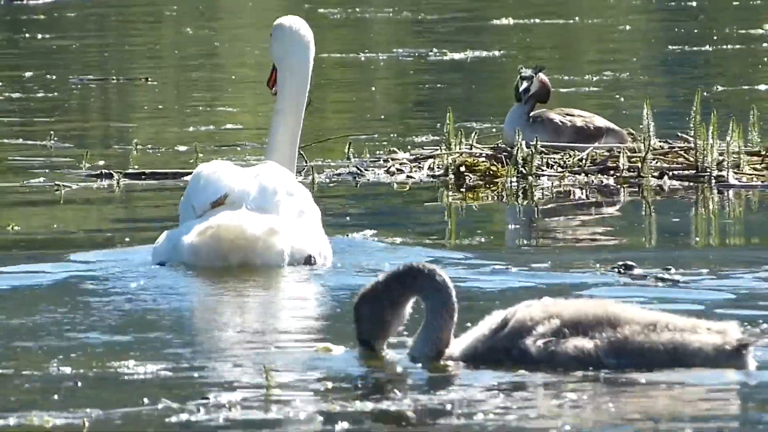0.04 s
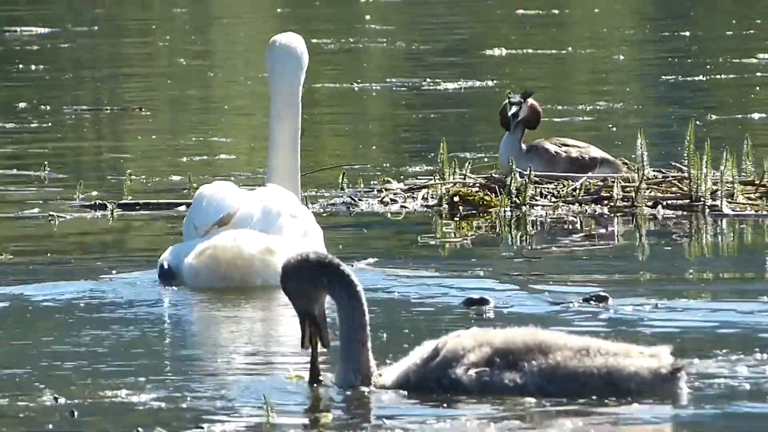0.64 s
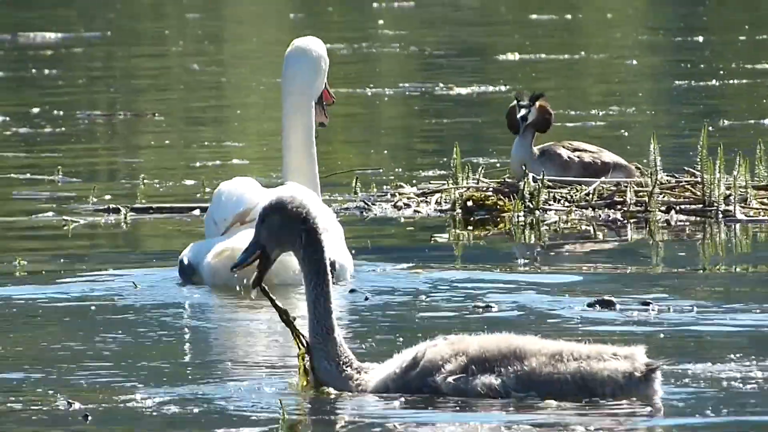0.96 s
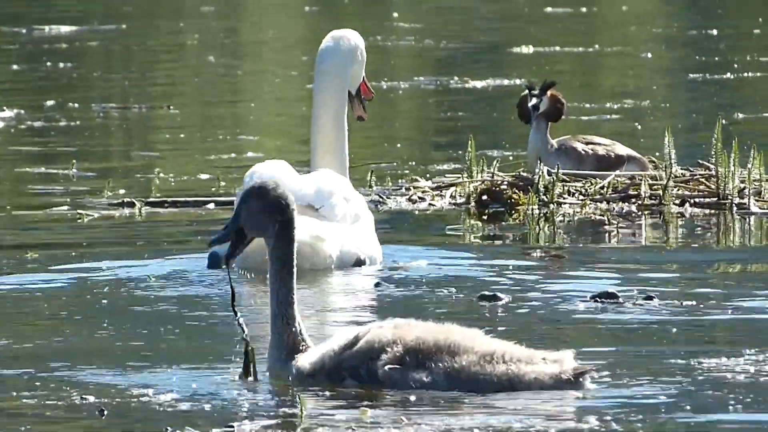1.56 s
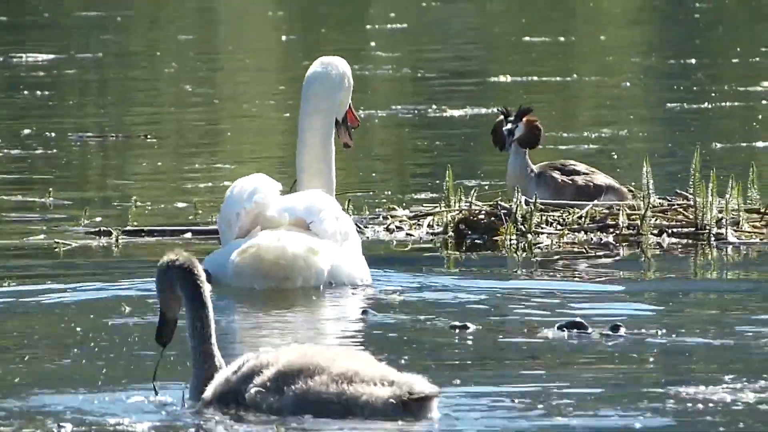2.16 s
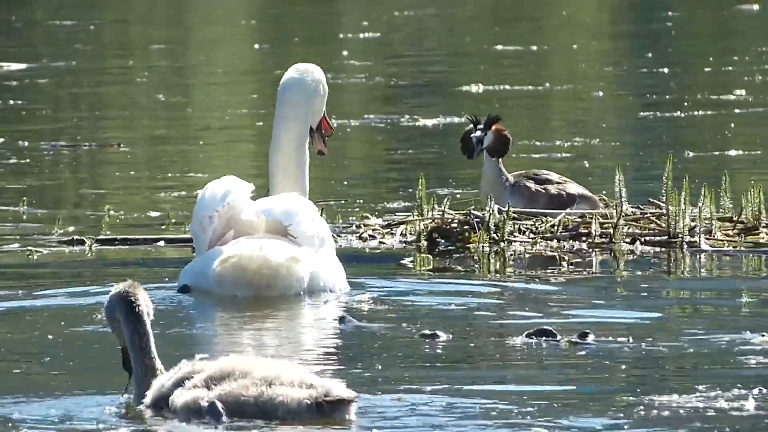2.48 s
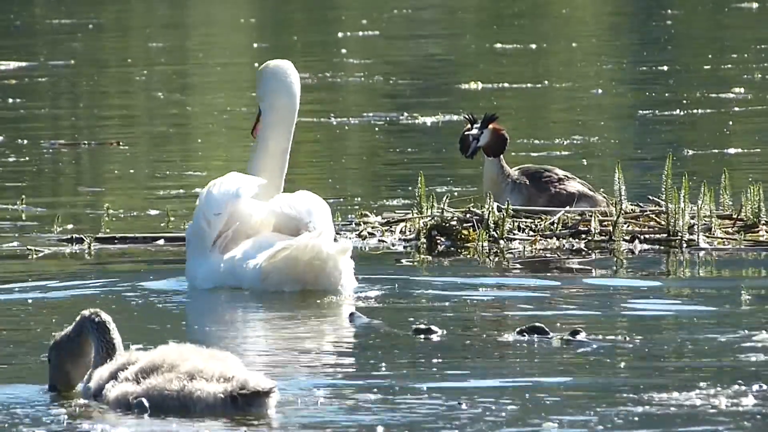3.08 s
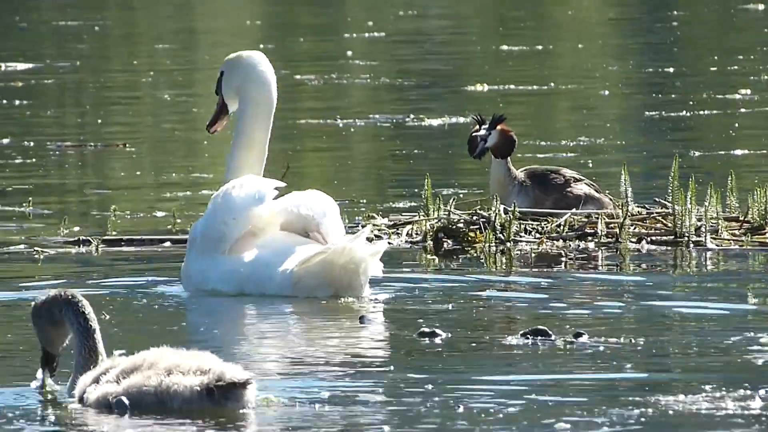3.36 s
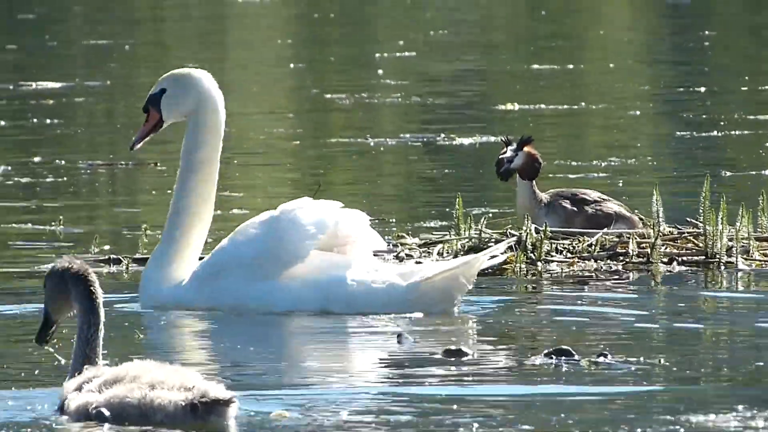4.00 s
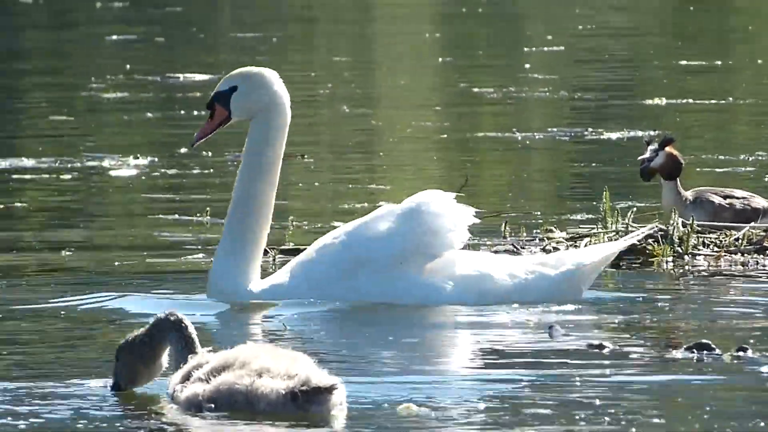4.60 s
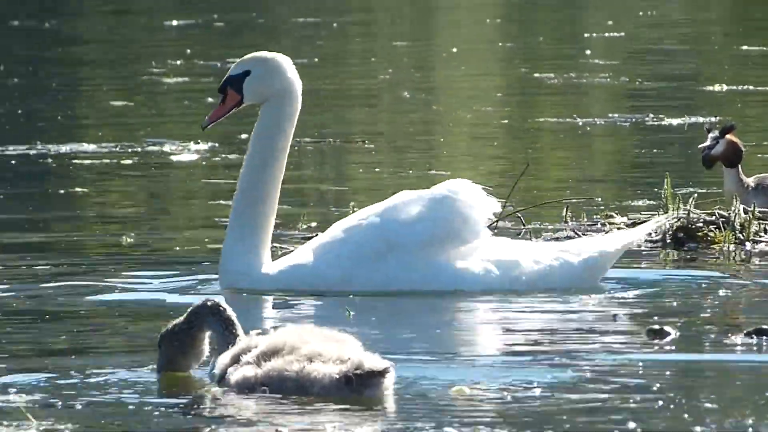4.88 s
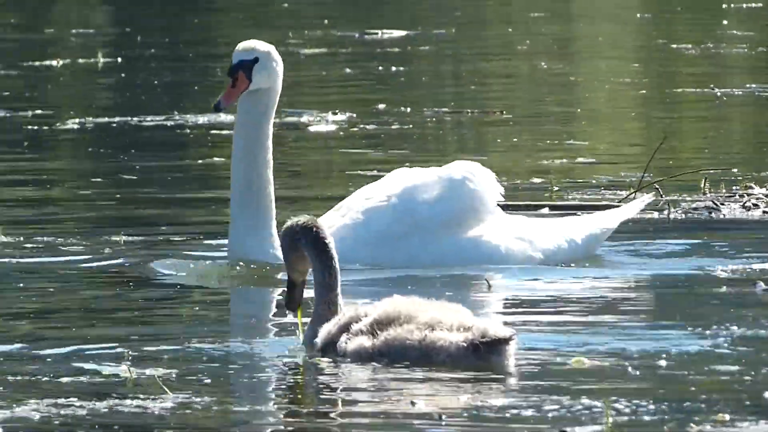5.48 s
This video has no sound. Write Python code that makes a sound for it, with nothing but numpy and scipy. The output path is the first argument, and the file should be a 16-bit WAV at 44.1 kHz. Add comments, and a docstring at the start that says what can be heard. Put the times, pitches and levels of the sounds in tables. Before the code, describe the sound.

A soft outdoor wash and a low hum hang over a lake while a lens motor whirrs at the microphone, stopping about halfway. Ahead on the water, a waterbird growls four times, rough and rattling, with a faint echo from the bank. Two brief breathy hisses fall between the third and fourth growls. Small drips come and go from a dabbling young swan, which ends with three thin peeps.

```python
"""A lake with a soft outdoor wash and a low hum throughout; a camera's lens motor whirrs until 3.1 s.
From the start a waterbird gives four harsh growls that break up into rattles: syrinx beats and air
puffs ring its throat and windpipe, throat catches chop the call, the bank returns a faint echo.
Meanwhile water drips as a young swan dabbles. Two short, soft, breathy hisses come near 3.5 and 3.7 s.
From 4.9 s, after the last growl, the young swan peeps three times among more drips."""
import sys
import numpy as np
from scipy import signal
from scipy.fft import rfft, irfft
from scipy.io import wavfile
from scipy.ndimage import uniform_filter1d

SR = 44100
rng = np.random.default_rng(int(sys.argv[2]) if len(sys.argv) > 2 else 0)


def store_pcm(level_fs):
    """Save levels as 16-bit WAV."""
    pcm = np.round(np.clip(level_fs, -1, 1) * 32767).astype(np.int16)
    wavfile.write(sys.argv[1], SR, np.atleast_2d(pcm).T)


N = 249165
TIME_S, BINS_HZ = np.arange(N) / SR, np.fft.rfftfreq(N, 1 / SR)

# Source spectra: freq_hz, gain_db
AIR_SPECTRUM = [(60, -17.5), (160, 0), (220, -10.5), (400, -9.5), (700, -8), (980, -5.5), (1250, -11),
                (1700, -13.5), (2500, -20.5), (3400, -23), (4500, -22), (8000, -25.5), (12000, -30.5),
                (15500, -37)]
RUMBLE_SPECTRUM = [(20, -20), (70, -30), (100, 2), (150, -0.5), (220, -15), (400, -48), (2000, -84)]
MOTOR_SPECTRUM = [(50, -48), (150, -15.5), (240, -7.5), (330, 4.5), (410, 1), (560, -12.5), (850, -6.5),
                  (1150, -16.5), (1550, -5.5), (1950, -22.5), (2400, -10.5), (2750, -24.5), (5500, -23),
                  (8700, -12.5), (9600, -28.5), (15000, -48)]
HISS_SPECTRUM = [(300, -23), (800, 5), (1600, 4.5), (2900, -13.5), (4700, 0.5), (7000, -4), (10000, -13),
                 (15000, -26)]
PEEP_SPECTRUM = [(1500, 0), (9000, 0)]
RASP_SPECTRUM = [(250, -7), (900, -2), (1600, 0), (2800, 1.5), (15000, -2)]
# Source resonances: freq_hz, width_hz, boost_db
MOTOR_PEAKS = [(1955, 120, 18), (4160, 110, 5.1), (4900, 190, 14), (7100, 290, 7.4)]
HISS_PEAKS = [(1630, 110, 10), (2580, 88, 17)]
PEEP_PEAKS = [(2360, 130, 10.5), (2790, 120, 8)]
# Throat spectra (bill nearly shut, half open, wide; high register; low rattle): freq_hz, gain_db
SHUT_SPECTRUM = [(150, -42), (250, -4), (370, -12), (500, -4), (620, -8), (740, 0), (1050, -8.5),
                 (1500, -7), (2300, -1.5), (3350, -1), (3950, -15), (4600, -10.5), (5600, -20.5),
                 (8000, -11), (15000, -44)]
HALF_SPECTRUM = [(150, -32), (250, -6), (580, -14), (760, -1), (1080, -11.5), (1400, 2), (2300, 0),
                 (3450, -1), (4600, -18.5), (8300, -14.5), (9500, -20), (15000, -39)]
WIDE_SPECTRUM = [(150, -43), (250, -11.5), (580, -16.5), (730, -6), (1150, -13), (1500, -5), (2400, 0.5),
                 (3300, -3), (3850, -11), (4500, -14.5), (5500, -23.5), (7200, -9.5), (9000, -25),
                 (11000, -36), (15000, -41)]
HIGH_SPECTRUM = [(200, -30), (350, -31), (580, -17), (730, -6), (1150, -3.5), (1400, -4), (1750, 1),
                 (2100, 4), (2450, 3.5), (2850, 5.5), (3750, 0), (4400, -13.5), (5500, -19), (7200, -8.5),
                 (10000, -26), (15000, -51)]
LOW_SPECTRUM = [(130, -35), (220, -11.5), (480, -21.5), (880, -0.5), (1220, -12), (1550, 4.5), (1950, -4),
                (2350, 6), (2680, -9), (3250, -0.5), (4000, -12.5), (5200, -29), (10500, -25.5),
                (15000, -43)]
# Throat resonances: freq_hz, width_hz, boost_db
SHUT_PEAKS = [(2880, 240, 2), (1530, 240, 10), (1300, 76, 5), (4560, 230, 6.5)]
CLOSING_PEAKS = [(2166, 340, 13.3), (1476, 130, 11.4), (3250, 99, 3.3), (4120, 150, 11)]
HALF_PEAKS = [(2040, 140, 7.7), (1260, 33, 1.5), (1010, 120, 12)]
WIDE_PEAKS = [(1726, 130, 8.1), (1007, 160, 11), (2060, 46, 1.6)]
HIGH_PEAKS = [(1418, 85, 9.1), (3120, 67, 3.7)]
LOW_PEAKS = [(1718, 160, 7.8), (2270, 47, 4), (1520, 55, 5), (2790, 43, 8.3)]

# Left-right likeness of the noise beds: freq_hz, coherence
NOISE_COHERENCE = [(40, 1), (150, 0.87), (380, 0.17), (950, 0.18), (2400, 0.48), (6000, 0.58),
                   (15000, 0.97)]
# Bank echo decay: freq_hz, t60_s
BANK_DECAY = [(200, 0.4), (1500, 0.44), (3000, 0.51), (8000, 0.092)]
# Growl balance: freq_hz, left_minus_right_db
GROWL_BALANCE = [(200, 2), (380, -7), (700, 0), (1290, -6.5), (2380, -1.1), (4400, 2.3), (8000, -1.5)]
# Growl phase between the ears: freq_hz, left_lead_rad
GROWL_PHASE = [(200, -0.063), (400, -1.2), (700, -1.1), (1200, 0.064), (1720, 0.5), (2400, 0.3), (3000, 1),
               (3800, 0.25), (8000, -1.1)]

# Drips and small splashes: start_s, level_db, centre_hz, t60_s
DRIPS = [(0.048, -44, 5500, .025), (.28, -53, 5300, 0.042), (0.389, -49, 7250, 0.026),
         (0.524, -48, 7000, 0.036), (0.769, -54, 1880, 0.027), (3.09, -53, 6860, .02),
         (3.17, -56, 5500, 0.026), (3.454, -56, 7000, .03), (3.569, -51, 3560, 0.017),
         (3.722, -55, 4000, 0.027), (3.727, -60, 1200, .05), (3.736, -55, 6500, .05),
         (4.721, -61, 6000, .03), (4.83, -64, 7000, 0.035), (4.893, -46.5, 1450, 0.03),
         (5.168, -64, 6960, .04), (5.262, -57, 4000, 0.023), (5.379, -46, 5150, 0.038),
         (5.389, -56, 6000, 0.079)]
# Breathy hisses: start_s, length_s, level_db
HISSES = [(3.429, 0.11, -61), (3.659, .13, -52)]
# Whistle arches: start_s, top_s, end_s, top_hz, source_db, second_harmonic_db
PEEPS = [(4.875, 4.95, 5.025, 2670, -63, 7), (5.155, 5.2, 5.322, 2930, -59, 1.5),
         (5.462, 5.535, 5.628, 3020, -55.5, -2)]
# Pushes of air: start_s, climb_db, attack_s, hold_end_s, release_s, level_db, sag_db_per_s, ring_db
GROWLS = [(0, 10, .002, .405, .176, -40, 1, 11), (.908, 40, .009, .948, .075, -35.5, 0, 9),
          (1.034, 40, .045, 1.466, .31, -33, 7, 9), (2.147, 40, .025, 2.654, .13, -23.9, 26, 8),
          (3.891, 21, .056, 4.627, .03, -25.2, 20.5, -2)]
# Voice contour, one list per push: time_s, low_register_hz, roughness
GROWL_VOICES = [
    [(0, 256, .33), (.11, 252, .45), (.21, 243, .28), (.31, 251, .1), (.405, 245, .02), (.48, 226, .18),
     (.55, 208, .35)],
    [(.91, 248, .83), (.945, 254, .4), (.99, 249, .2)],
    [(1.06, 245, .2), (1.13, 262, .36), (1.265, 253, .5), (1.41, 245, .33), (1.55, 235, .42),
     (1.72, 215, .25)],
    [(2.15, 243, .8), (2.2, 250, .48), (2.3, 250, .55), (2.335, 243, .7), (2.43, 238, .25), (2.53, 225, .7),
     (2.6, 228, .75), (2.76, 225, .55)],
    [(3.89, 188, .65), (3.98, 218, .3), (4.05, 219, .28), (4.1, 226, .6), (4.17, 215, .45),
     (4.27, 227, .65), (4.43, 238, .42), (4.65, 215, .55)],
]
# Runs of throat catches: first_s, last_s, gap_s, first_depth_db, last_depth_db
RATTLES = [(.228, .344, .058, 3, 2), (.389, .475, .043, 6.5, 3), (1.235, 1.477, .06, 2.5, 7),
           (1.524, 1.707, .06, 9, 8), (2.197, 2.271, .037, 8, 4), (2.363, 2.457, .047, 3, 5),
           (2.492, 2.678, .046, 4.5, 5.5), (3.94, 3.94, .09, 6, 6), (4.077, 4.153, .038, 6, 4.5),
           (4.2, 4.36, .04, 8, 10), (4.406, 4.458, .052, 10, 13), (4.502, 4.585, .042, 9, 10)]

BREAK_FROM_S, BREAK_TO_S = 2.316, 2.59  # span of the high register


def amp(db):
    """Decibels to gain."""
    return 10 ** (np.asarray(db) / 20)


def unit(x):
    """Scale to rms 1."""
    return x / np.sqrt(np.mean(x ** 2) + 1e-20)


def steady(x, size=1100):
    """Hold the short-term rms at 1."""
    power = uniform_filter1d(uniform_filter1d(x ** 2, size), size)
    return x / np.sqrt(abs(power) + 1e-12)


def at_hz(table, hz):
    """Interpolate a table over log frequency."""
    freq_hz, values = np.transpose(table)
    return np.interp(np.log(hz + 1), np.log(freq_hz), values)


def add(mix, start_s, sound):
    """Mix a sound in at start_s."""
    part = mix[max(0, round(start_s * SR)):][:len(sound)]
    part += sound[:len(part)]


def wobble(n, rate_hz):
    """Smooth random drift, rms about 1."""
    lowpass = np.exp(-(BINS_HZ / rate_hz) ** 2)
    return unit(irfft(rfft(rng.standard_normal(N)) * lowpass, N))[:n]


def colour(x, spectrum, peaks=(), size=8192):
    """Minimum-phase filter: broad spectrum plus narrow resonances."""
    hz = abs(np.fft.fftfreq(size, 1 / SR))
    peaks_db = sum(db / (1 + (2 * (hz - peak_hz) / width_hz) ** 2) for peak_hz, width_hz, db in peaks)
    log_gain = np.log(amp(at_hz(spectrum, hz) + peaks_db))
    taps = np.fft.ifft(np.exp(np.conj(signal.hilbert(log_gain)))).real[:size // 2]
    return signal.fftconvolve(x, taps)[:len(x)]


def resonate(x, hz, width_hz):
    """One resonance, gain about 1."""
    radius = np.exp(-np.pi * width_hz / SR)
    return 2 * signal.lfilter([1 - radius], [1, -radius * np.exp(2j * np.pi * hz / SR)], x).real


def stereo_noise(spectrum, peaks=()):
    """Coloured noise, partly shared by left and right."""
    coherence = np.clip(at_hz(NOISE_COHERENCE, BINS_HZ), 0, 1)
    mid, side = irfft(rfft(rng.standard_normal((2, N))) * np.sqrt([1 + coherence, 1 - coherence]), N)
    return unit(np.array([colour(mid + sign * side, spectrum, peaks) for sign in (1, -1)]))


def background(air_db=-57.5, lean_db=-.7, rumble_db=-66, hum_hz=111.1, hum_db=-55, rise_db_per_s=.55):
    """Even outdoor wash, low rumble and a wavering hum that slowly grows."""
    air = stereo_noise(AIR_SPECTRUM) * amp(air_db + np.array([[lean_db], [-lean_db]]) / 2)
    phase_rad = 2 * np.pi * np.cumsum(hum_hz + .23 * wobble(N, 4.7)) / SR
    hum = np.sqrt(2) * np.sin(phase_rad) * amp(hum_db + rise_db_per_s * TIME_S + .4 * wobble(N, 3))
    return air + amp(rumble_db) * stereo_noise(RUMBLE_SPECTRUM) + hum


def lens_motor(idle_db=-64, run_db=-54.8, run_s=.6, stop_s=3.12, ramp_s=.4, flutter_db=.97):
    """Small gears whirr: quiet at idle, louder on spin-up, fading to a stop."""
    spin_up = np.clip((TIME_S - run_s) / ramp_s, 0, 1)
    wind_down = np.sqrt(np.clip((stop_s - TIME_S) / ramp_s, 0, 1))
    envelope = (amp(idle_db) + amp(run_db) * spin_up) * wind_down
    return stereo_noise(MOTOR_SPECTRUM, MOTOR_PEAKS) * envelope * amp(flutter_db * wobble(N, 43))


def lake_echo(x, near_db=-13, near_t60_s=.18, bank_db=-24):
    """Add quick scatter from water and reeds and a faint bank tail, different at each ear."""
    hz, frame_s, noise = signal.stft(rng.standard_normal((2, SR // 2)), SR, nperseg=256)
    decay = amp(-60 * frame_s / at_hz(BANK_DECAY, hz)[:, None])
    bank = signal.istft(noise * decay, SR, nperseg=256)[1]
    age_s = np.arange(bank.shape[1]) / SR
    near = rng.standard_normal(bank.shape) * amp(-60 * age_s / near_t60_s)
    echo = amp(near_db) * near / np.linalg.norm(near[0]) + amp(bank_db) * bank / np.linalg.norm(bank[0])
    return x + signal.fftconvolve(x[None], echo, axes=1)[:, :N]


def drips(width_share=.38, attack_s=.000067):
    """Short spatters on the water, brighter for small drops."""
    out, age_s = np.zeros(N), np.arange(SR // 4) / SR
    for start_s, level_db, hz, t60_s in DRIPS:
        spray = resonate(rng.standard_normal(len(age_s)), hz, hz * width_share)
        spray = resonate(spray, hz, 2 * hz * width_share)
        envelope = amp(level_db - 60 * age_s / t60_s) * (1 - np.exp(-age_s / attack_s))
        add(out, start_s, steady(spray, size=120) * envelope)
    return out


def breathy_hisses(flutter_db=2):
    """Two short, soft, breathy hisses with a faint ring."""
    out = np.zeros(N)
    for start_s, length_s, level_db in HISSES:
        n = round(length_s * SR)
        noise = rng.standard_normal(n) * amp(flutter_db * wobble(n, 120))
        hiss = unit(colour(noise, HISS_SPECTRUM, HISS_PEAKS))
        add(out, start_s, amp(level_db) * hiss * np.hanning(n))
    return out


def swan_peeps(foot_hz=2250, fade_db=-20, flutter_db=3, third_db=-19, hiss_db=-23, attack_s=.025):
    """Thin, fluttering arched whistles that flare as they cross the throat's resonances."""
    out = np.zeros(N)
    for start_s, top_s, end_s, top_hz, source_db, second_db in PEEPS:
        time_s = np.arange(start_s, end_s, 1 / SR)
        n = len(time_s)
        droop = np.interp(time_s, [start_s, top_s, end_s], [1, 0, 1]) ** 2
        pitch_hz = (top_hz + (foot_hz - top_hz) * droop) * (1 + .022 * wobble(n, 250))
        phase_rad = 2 * np.pi * np.cumsum(pitch_hz) / SR
        overtones = np.sin(2 * phase_rad) + amp(third_db) * np.sin(3 * phase_rad)
        overtones *= amp(second_db + fade_db * droop + flutter_db * wobble(n, 120))
        tone = np.sin(phase_rad) * amp(flutter_db * wobble(n, 100)) + overtones
        hiss = amp(hiss_db) * unit(resonate(rng.standard_normal(n), hz=3800, width_hz=2500))
        envelope = (1 - np.exp(-(time_s - start_s) / attack_s)) * signal.windows.tukey(n, .1)
        add(out, start_s, (np.sqrt(2) * tone + hiss) * amp(source_db) * envelope)
    return colour(out, PEEP_SPECTRUM, PEEP_PEAKS)


def throat_catches(time_s, gap_share=.18):
    """Choking in dB; held-back pressure bursts out between catches."""
    choke_db = np.zeros(len(time_s))
    for first_s, last_s, gap_s, first_db, last_db in RATTLES:
        count = round(abs(last_s - first_s) / gap_s) + 1
        for catch_s, depth_db in np.linspace((first_s, first_db), (last_s, last_db), count):
            choke_db += depth_db * np.exp(-((time_s - catch_s) / (gap_share * gap_s)) ** 2)
    return choke_db - uniform_filter1d(choke_db, size=3000)


def breath(push, voice, release_db=24, break_ratio=1.475, break_ring_db=-28):
    """One push of air: attack, sagging hold, release. Catches choke, flatten and smooth the voice."""
    start_s, climb_db, attack_s, hold_end_s, release_s, level_db, sag_db_per_s, ring_db = push
    time_s = np.arange(start_s, hold_end_s + release_s, 1 / SR)
    age_s, catch_db = time_s - start_s, throat_catches(time_s)
    slack_db = climb_db * np.exp(-age_s / attack_s)
    slack_db += release_db * np.maximum(time_s - hold_end_s, 0) / release_s
    effort_db = level_db - sag_db_per_s * age_s - slack_db - catch_db
    # The high register is cleaner and misses the windpipe's ring; slack effort damps the ring too.
    high = uniform_filter1d(((time_s > BREAK_FROM_S) & (time_s < BREAK_TO_S)).astype(float), size=400)
    knot_s, knot_hz, knot_rough = np.transpose(voice)
    pitch_hz = np.interp(time_s, knot_s, knot_hz) * (1 - .007 * catch_db) * break_ratio ** high
    rough = np.clip((np.interp(time_s, knot_s, knot_rough) - .02 * catch_db) * .46 ** high, 0, 1)
    ring_db = ring_db - .05 * slack_db + break_ring_db * high
    return time_s, effort_db, pitch_hz, rough, ring_db, high


def beats(turns):
    """One click per whole turn, placed between samples."""
    at = np.flatnonzero(np.diff(np.floor(turns)) > 0)
    late = (np.ceil(turns[at]) - turns[at]) / (turns[at + 1] - turns[at])
    clicks = np.zeros(len(turns))
    clicks[at], clicks[at + 1] = 1 - late, late
    return clicks


def syrinx(pitch_hz, rough, high, jitter=.062, shimmer=.27, rasp=1.35, twin=.23):
    """Soft, uneven beats and air puffs; in the high register a mid-cycle beat lifts even harmonics."""
    n = len(pitch_hz)
    turns = np.cumsum(pitch_hz * (1 + jitter * rough * wobble(n, 130))) / SR
    pulses = beats(turns) + twin * high * beats(turns + .5)
    pulses = uniform_filter1d(pulses * np.exp(shimmer * rough * wobble(n, 200)), size=3)
    airflow = 1.8 + np.exp(-(turns % 1) / 2.7)
    puffs = colour(airflow * rng.standard_normal(n), RASP_SPECTRUM)
    return (1 - rough) * unit(pulses) + rasp * rough * unit(puffs)


def disperse(x):
    """All-pass chain: sound lingers in the tract, so a beat swells over a few cycles."""
    for hz, width_hz in (1400, 450), (2100, 500), (2800, 450), (3500, 800), (7000, 1500):
        radius = np.exp(-np.pi * width_hz / SR)
        poles = [1, -2 * radius * np.cos(2 * np.pi * hz / SR), radius ** 2]
        x = signal.lfilter(poles[::-1], poles, x)
    return x


def reflect(x, delay_s=.00243, gain=.33):
    """A close reflection combs the voice."""
    at = np.arange(len(x))
    return x + gain * np.interp(at - delay_s * SR, at, x, left=0)


def growl(push, voice, throats):
    """The syrinx rings throat and windpipe; the upper resonances bite harder with effort."""
    time_s, effort_db, pitch_hz, rough, ring_db, high = breath(push, voice)
    drive = disperse(syrinx(pitch_hz, rough, high))
    shape = np.maximum(np.searchsorted([from_s for from_s, _, _ in throats], time_s) - 1, 0)
    body = sum(uniform_filter1d((shape == k).astype(float), size=500) * colour(drive, spectrum, peaks)
               for k, (_, spectrum, peaks) in enumerate(throats))
    bite_db = -1.3 + .55 * np.maximum(effort_db - np.median(effort_db), -10)
    body += (amp(bite_db) - 1) * resonate(body, hz=3700, width_hz=1200)
    windpipe = amp(ring_db) * resonate(body, hz=2455, width_hz=110)
    call = steady(reflect(steady(body + windpipe)), size=330)
    return time_s[0], call * amp(effort_db) * signal.windows.tukey(len(call), .03)


def waterbird():
    """Four growls: a grunt leads in the second; the third breaks upward, then drops into the rattle."""
    # Throat shapes in turn: from_s, spectrum, peaks
    closing = [(0, SHUT_SPECTRUM, SHUT_PEAKS), (.29, SHUT_SPECTRUM, CLOSING_PEAKS)]
    half_open, low = [(0, HALF_SPECTRUM, HALF_PEAKS)], [(0, LOW_SPECTRUM, LOW_PEAKS)]
    breaking = [(0, WIDE_SPECTRUM, WIDE_PEAKS), (BREAK_FROM_S, HIGH_SPECTRUM, HIGH_PEAKS),
                (BREAK_TO_S, LOW_SPECTRUM, LOW_PEAKS)]
    out = np.zeros(N)
    for push, voice, throats in zip(GROWLS, GROWL_VOICES, [closing, half_open, half_open, breaking, low]):
        add(out, *growl(push, voice, throats))
    return out


def scene():
    """Birds ahead on the water; the lower part of the growl leans right."""
    to_left = amp(at_hz(GROWL_BALANCE, BINS_HZ) / 2) * np.exp(.5j * at_hz(GROWL_PHASE, BINS_HZ))
    growls = irfft(rfft(lake_echo(waterbird())) * np.array([to_left, 1 / to_left]), N)
    small_sounds = lake_echo(swan_peeps() + drips() + breathy_hisses())
    return growls + small_sounds + background() + lens_motor()


def record(dry):
    """Low-pass at 15.7 kHz."""
    taps = signal.firwin(511, 15700, window=("kaiser", 9), fs=SR)
    return signal.oaconvolve(dry, taps[None], "same")


dry = scene()
out = record(dry)
store_pcm(out)
```